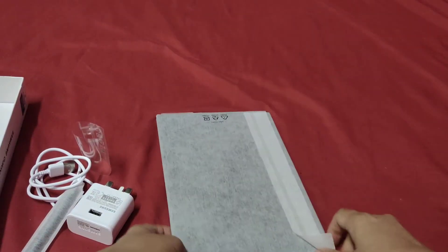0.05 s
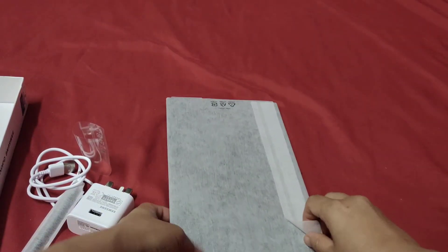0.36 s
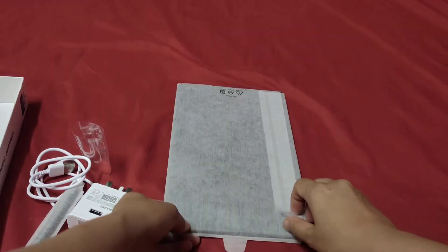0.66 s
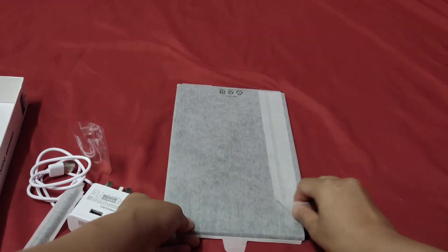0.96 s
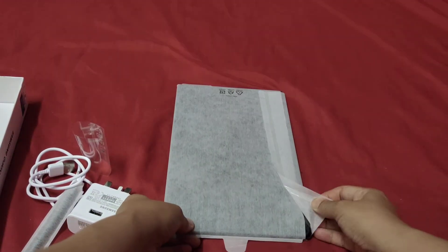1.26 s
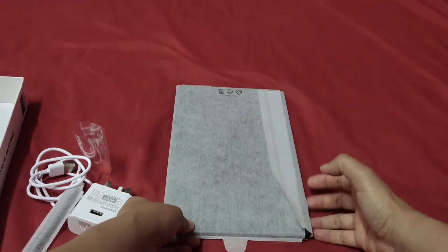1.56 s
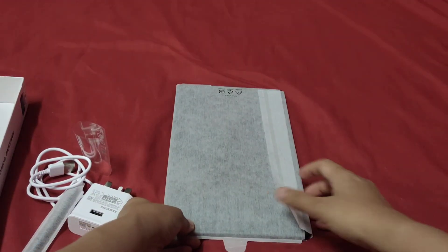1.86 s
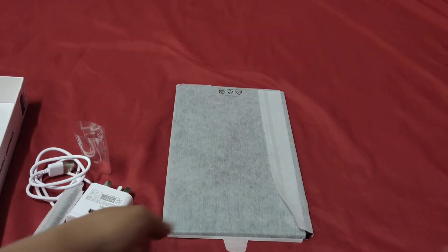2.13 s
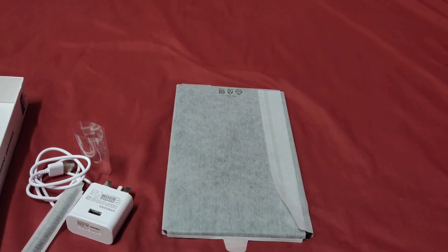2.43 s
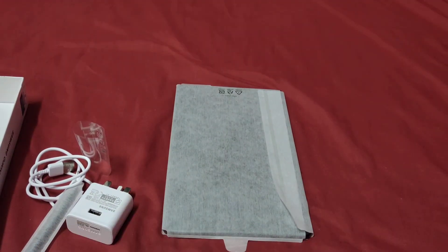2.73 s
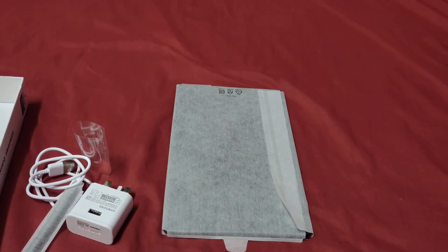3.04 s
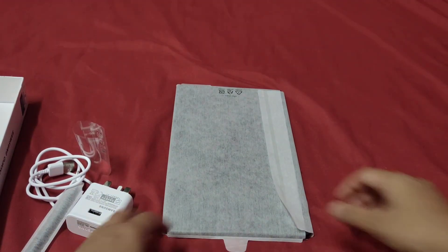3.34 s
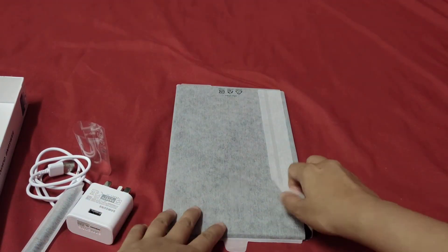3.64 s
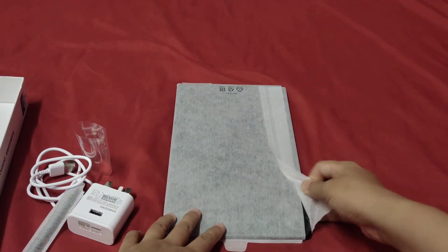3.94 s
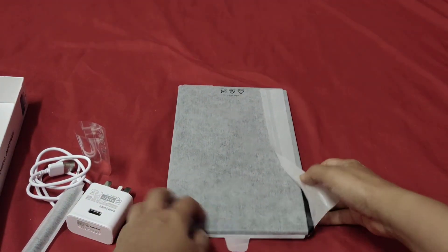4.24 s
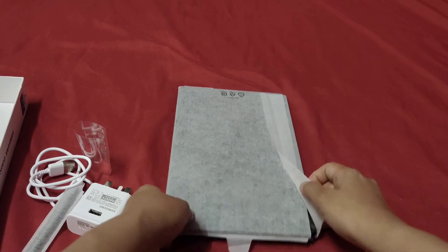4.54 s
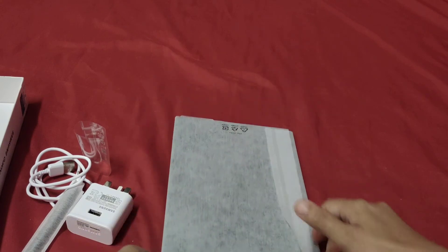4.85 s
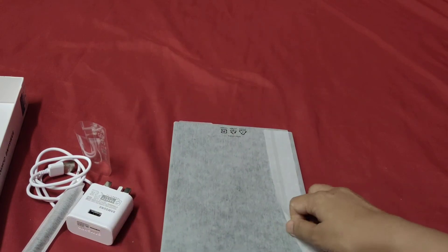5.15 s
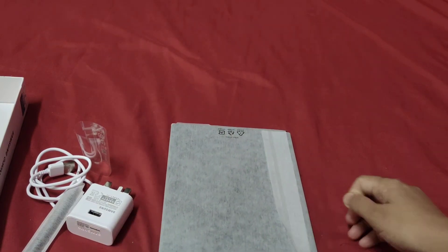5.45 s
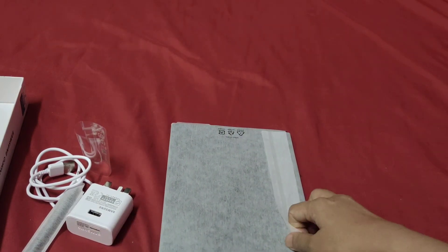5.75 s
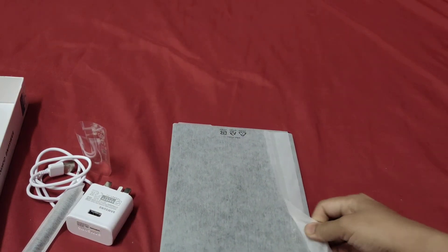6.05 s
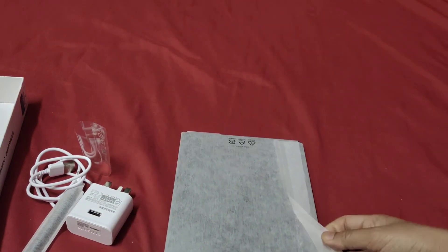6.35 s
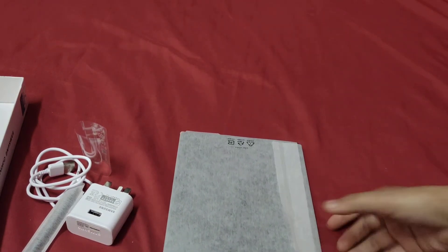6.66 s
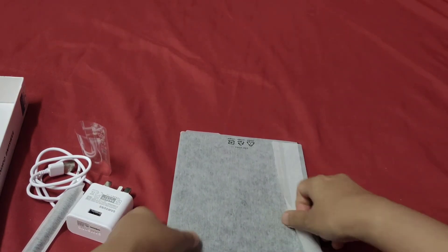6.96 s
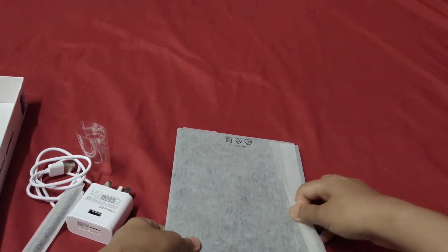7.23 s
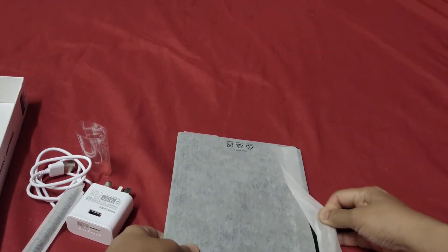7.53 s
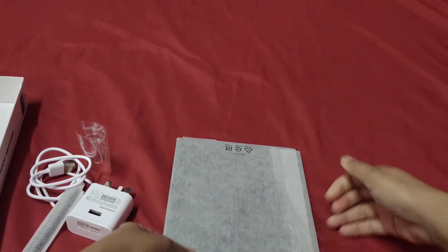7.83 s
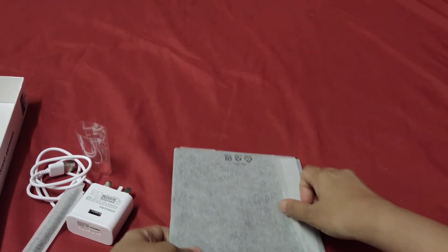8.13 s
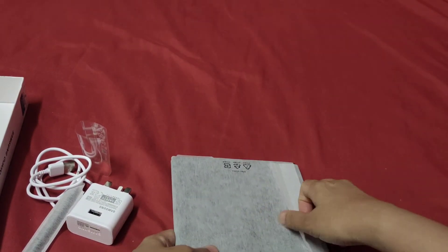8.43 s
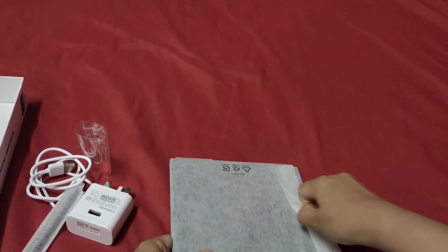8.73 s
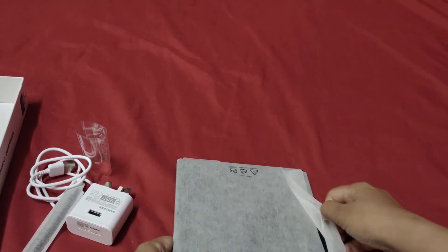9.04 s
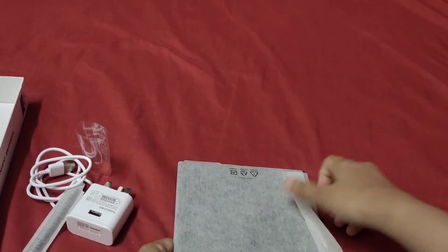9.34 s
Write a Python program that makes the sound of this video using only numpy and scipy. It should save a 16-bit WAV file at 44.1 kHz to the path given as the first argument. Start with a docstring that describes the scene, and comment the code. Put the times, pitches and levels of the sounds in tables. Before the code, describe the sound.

Crisp snaps and crinkles of a glued paper flap being picked open, close by, with faint finger rubs between tugs.

```python
"""A small, quiet room, where hands tug at the glued flap of a stiff paper sleeve on a cloth-covered table.
Energy stored in the bent paper is released in runs of dry snaps as creases buckle and glue spots let go.
Between tugs, fingers rub the sleeve by stick-slip friction, and it is dragged, bumped and patted down.
Near walls answer briefly, a faint motor drones far away, and a phone listens from close by."""
import sys
import numpy as np
from scipy import signal
from scipy.fft import rfft, irfft
from scipy.io import wavfile
from scipy.ndimage import uniform_filter1d

SR = 44100
rng = np.random.default_rng(int(sys.argv[2]) if len(sys.argv) > 2 else 0)


def to_wav(s):
    """Save 16-bit WAV."""
    ch = np.atleast_2d(s).T  # columns
    pcm = np.round(np.clip(ch, -1, 1) * 32767)  # PCM
    wavfile.write(sys.argv[1], SR, pcm.astype(np.int16))


N = 414080


def undb(db):
    """Amplitude ratio: tenfold for every 20 dB."""
    return 10 ** (np.asarray(db) / 20)


def bins(size):
    """Frequencies in Hz of a real Fourier transform."""
    return np.fft.rfftfreq(size, 1 / SR)


def log_curve(hz, points_hz, values):
    """Linear interpolation on a logarithmic frequency axis."""
    return np.interp(np.log(hz + 1), np.log(points_hz), values)


def resonance(hz, centre_hz, width_hz, db):
    """Damped resonance: a spectral peak that rings on after the blow."""
    return 1 + (undb(db) - 1) / (1 + 2j * (hz - centre_hz) / width_hz)


def wander(size, rate_hz):
    """Random modulation: straight lines between Gaussian values."""
    knots = rng.standard_normal(int(size / SR * rate_hz) + 2)
    return np.interp(np.arange(size) / SR * rate_hz, np.arange(len(knots)), knots)


def add(out, sound, start_s):
    """Superposition: a sound joins the mix at a given time."""
    start = max(int(start_s * SR), 0)
    part = sound[..., :N - start]
    out[:, start:start + part.shape[-1]] += part


def stereo_noise(size, share):
    """Partial coherence: two white noises share part of their power, overall or by frequency."""
    common, own = rfft(rng.standard_normal(size)), rfft(rng.standard_normal((2, size)))
    return irfft(np.sqrt(share) * common + np.sqrt(1 - share) * own)


# Noise of the still room. Each row: frequency in Hz, relative spectral density in dB.
AIR_SPECTRUM = [(15, -43), (25, -12), (59, -7), (120, -8.5), (145, -19), (190, -6), (229, -11), (394, -19),
                (489, -19), (1290, -29), (1400, -35.5), (1560, -32.5), (2760, -36.5), (7110, -43.5),
                (16000, -55.5)]


def air(level_db=-70, waver_db=-0.27):
    """Diffuse field: room noise, most coherent in the bass, with a thin band of hiss high up."""
    hz = bins(N)
    field = rfft(stereo_noise(N, log_curve(hz, [100, 1000, 6000], [.65, .45, .35])))
    colour = undb(log_curve(hz, *np.transpose(AIR_SPECTRUM)))
    noise = irfft(field * colour * resonance(hz, 7300, width_hz=500, db=6))
    return noise / np.std(noise.mean(axis=0)) * undb(level_db + waver_db * wander(N, 6))


# Swells of a distant motor. Each row: crest time in seconds, half length in seconds,
# crest level in dB, pitch at the crest in Hz, glide in Hz per second.
MOTOR_SWELLS = [(0.804, .72, -58, 68, -1.9), (3.318, .29, -61, 111.2, 19.5)]


def motor():
    """Transmission loss: only the lowest order of a far motor gets through the walls."""
    out = 0
    for crest_s, half_s, db, hz, glide in MOTOR_SWELLS:
        t = np.arange(N) / SR - crest_s
        swell = np.sqrt(2) * undb(db) * np.exp(-(t / half_s) ** 2)
        out = out + swell * np.sin(2 * np.pi * (hz + glide * t / 2) * t)
    return out


# Reverberant bands. Each row: centre in Hz, gain in dB, time to decay by 60 dB in seconds.
ROOM_BANDS = [(150, -9.5, .2), (550, -5.5, 0.14), (1210, -10, 0.1), (2500, -3, 0.2), (4860, -4, 0.22),
              (8040, -12.5, 0.33), (13900, -9.5, 0.22)]


def room(sound, gap_s=0.0038, build_s=0.0039):
    """Reverberation: reflections from near walls and furniture build a dense, short tail."""
    size = SR // 2
    t, hz = np.arange(size) / SR, bins(size)
    centres, levels, decays = np.transpose(ROOM_BANDS)
    echoes = rfft(stereo_noise(size, share=0.31) * undb(1.4 * wander(size, 700)))
    onset = 1 - np.exp(-np.maximum(t - gap_s, 0) / build_s)
    response = 0
    for weights, db, t60 in zip(np.eye(len(ROOM_BANDS)), levels, decays):
        band = irfft(echoes * log_curve(hz, centres, weights))
        fade = onset * undb(-60 * t / t60)
        response = response + band * undb(db) * fade / np.sqrt(np.sum(fade ** 2))
    return signal.fftconvolve(sound, response, axes=1)[:, :N]


# Coherence of a close sound. Each row: frequency in Hz, share of power common to both ports (0 to 1).
PORT_COHERENCE = [(300, 0.7), (1200, 0), (4500, 0.9), (9000, 0.08)]


def close_noise(size):
    """Spaced receivers: noise at two microphone ports, whose coherence varies with frequency."""
    return stereo_noise(size, log_curve(bins(size), *np.transpose(PORT_COHERENCE)))


# Resonances of sleeve and microphone. Each row: centre in Hz, width in Hz, gain in dB.
RING_PEAKS = [(4710, 410, 4.5), (11900, 780, 3.5)]


def ringing(hz):
    """Resonant colouring: the same peaks shape every rub and snap."""
    return undb(sum(db / (1 + (2 * (hz - centre) / width) ** 2) for centre, width, db in RING_PEAKS))


# Soft knocks on the table. Each row: time in seconds, level in dB.
TABLE_BUMPS = [(2.56, -53), (2.665, -58), (3.08, -71.5), (3.915, -51.5), (6.682, -53.5)]


def bumps(low_hz=48, high_hz=76, rise_s=0.0034, decay_s=0.034):
    """Cushioned impact: a knock through the cloth excites two low modes of the table top."""
    out, t = np.zeros((2, N)), np.arange(SR // 4) / SR
    modes = np.sin(2 * np.pi * low_hz * t) + np.sin(2 * np.pi * high_hz * t)
    thud = modes * np.exp(-t / decay_s) * (1 - np.exp(-t / rise_s))
    for s, db in TABLE_BUMPS:
        add(out, undb(db) * thud, s - .01)
    return out


# Slides of the sleeve. Each row: start in seconds, end in seconds, level in dB.
SLEEVE_DRAGS = [(3.302, 3.59, -77), (4.522, 4.74, -68)]


def drags(band_hz=(220, 650), judder_db=4):
    """Sliding friction: the weight of the sleeve judders dully over the cloth."""
    out = np.zeros((2, N))
    body = signal.butter(2, band_hz, "band", fs=SR, output="sos")
    for start, end, db in SLEEVE_DRAGS:
        size = 2 * int((end - start) * SR / 2)
        slide = signal.sosfilt(body, close_noise(size) * undb(judder_db * wander(size, 55)))
        add(out, slide / np.std(slide) * undb(db) * signal.windows.tukey(size, .5), start)
    return out


# Modes of the air pocket. Each row: frequency in Hz, relative level in dB, 60 dB decay time in seconds.
POCKET_MODES = [(496, 5.5, 0.01), (556, -17, 0.03)]
# The sleeve pressed shut. Each row: start in seconds, level in dB, pitch as a multiple of the pocket's.
SLEEVE_PATS = [(4.795, -53.5, 1), (4.9365, -32.5, 1.25), (7.8587, -19, 1)]


def pats(rise_s=0.00075):
    """Cavity resonance: the hand squeezes the air from under the sleeve with a hollow pop."""
    out, t = np.zeros((2, N)), np.arange(SR // 10) / SR
    for start, level_db, pitch in SLEEVE_PATS:
        pop = sum(undb(db - 60 * t / t60) * np.sin(2 * np.pi * pitch * hz * t)
                  for hz, db, t60 in POCKET_MODES)
        add(out, undb(level_db) * pop * (1 - np.exp(-t / rise_s)), start)
    return out


# Fingers sliding on paper and cloth. Each row: start in seconds, end in seconds,
# relative level in dB, midrange shading in dB, treble shading in dB.
FINGER_RUBS = [(0, .17, -59.5, -3.5, -11), (.17, .43, -62.5, -1, -10), (.4, .56, -68.5, -1, -1.5),
               (.53, .78, -61.5, 0.5, -9), (2.07, 2.24, -60, -13, -16), (3.24, 3.599, -66.5, 7.5, -21.5),
               (3.719, 3.857, -67.5, -3.5, -10), (4.332, 4.88, -69, 2.5, -8), (5.002, 5.08, -64.5, -18, -7),
               (5.11, 5.21, -65, 9.5, -8), (5.41, 5.442, -47.5, 1, -5.5), (5.757, 5.9, -68, 4, -10.5),
               (6.92, 7.143, -66.5, -6.5, -6), (8.146, 8.419, -63, 2, -12), (8.497, 8.68, -74.5, 10.5, -7),
               (8.828, 8.93, -44, 4.5, -11), (9.255, 9.305, -49, 3, -13.5)]
# Tugs at the flap. Each row: time the glue first gives in seconds, relative level of the lead-in rub
# in dB, left minus right level of nearby snaps in dB, their gain into the room in dB.
FLAP_TUGS = [(1.242, -58, 3, -2), (1.646, -69, 3, -.5), (3.995, -70.5, 1.5, 0.5), (4.936, -63, 1, -1.5),
             (6.128, -61.5, 0, 0), (6.672, -56, 3, -1.5), (7.448, -68, 1, -1), (7.857, -62.5, 1, -3.5),
             (8.893, -50, 3.5, 0.5)]


def strokes(lead_s=.095, overlap_s=.035, middle_db=2, top_db=-6):
    """Friction under load: the free finger rubs, plus a short, bright one that leads into each tug."""
    return FINGER_RUBS + [(s - lead_s, s + overlap_s, db, middle_db, top_db) for s, db, _, _ in FLAP_TUGS]


def rubbing(gain_db=-2, grain_db=2.5, waver_db=3, grain_samples=32):
    """Stick-slip friction: fibres catch and slip, stirring two broad sheet modes into an uneven swish."""
    out = np.zeros((2, N))
    for start, end, db, middle_db, top_db in strokes():
        size = 2 * int((end - start) * SR / 2)
        hz = bins(size)
        # a fibre holds only so much before it slips
        holds = np.minimum(rng.exponential(size=size // grain_samples + 1), 4.5)
        catches = undb(grain_db * np.repeat(holds, grain_samples)[:size])
        fibres = close_noise(size) * catches / np.sqrt(np.mean(catches ** 2))
        colour = undb(log_curve(hz, [200, 1500, 2500, 4800, 9500, 15500],
                                [-8, middle_db - 7.5, middle_db - 4, -3, top_db, top_db]))
        modes = resonance(hz, 4800, width_hz=880, db=4) * resonance(hz, 2600, width_hz=600, db=3)
        pressure = signal.windows.tukey(size, 0.71) * undb(db + gain_db + waver_db * wander(size, 56))
        add(out, irfft(rfft(fibres) * colour * ringing(hz) * modes) * pressure, start)
    return out


def stray_ticks(per_second=2.2, above_stroke_db=18.5, spread_db=2, top_db=-3, low_hz=2390, high_hz=6000):
    """Small-scale buckling: tiny creases give way at random under a sliding finger."""
    ticks = []
    for start, end, stroke_db, _, _ in strokes():
        count = int((end - start) * per_second + .5)
        for when, strength, facet in rng.random((count, 3)):
            db = stroke_db + above_stroke_db + spread_db * (2 * strength - 1)
            ping_hz = low_hz + facet * (high_hz - low_hz)
            ticks.append((start + when * (end - start), db, 0, top_db, ping_hz))
    return crinkle(ticks)


def snap(body_db, top_db, ping_hz, rise_s=0.00051, fall_s=0.00055, bending_s=0.0014, size=1024):
    """Buckling: fibres give way in a millisecond of tiny fractures, and the freed facet pings."""
    t, hz = (np.arange(size) - size // 2) / SR, bins(size)
    fracture = np.tanh(0.66 * np.exp(-np.abs(t) / np.where(t < 0, rise_s, fall_s)))
    # a faint, brief swell of noise before the snap and a short fade after it
    skirts = undb(-24) * np.exp(-np.abs(t) / np.where(t < 0, .0025, .004))
    burst = rfft(close_noise(size) * (fracture + skirts))
    # so brief a burst is broad: only narrow ripples remain in its spectrum
    burst = burst / np.sqrt(uniform_filter1d(np.abs(burst) ** 2, size=61, axis=-1))
    middle_db = 0.55 * body_db - 0.2  # a larger facet has more body and more midrange
    shape_db = [body_db - 14, body_db, (body_db + middle_db) / 2, middle_db, 0, top_db, top_db - 6.5]
    colour = undb(log_curve(hz, [60, 450, 1100, 2300, 4800, 9500, 15500], shape_db))
    delay_s = bending_s / (1 + hz / 900)  # dispersion: slow bending waves bring the lows late
    burst = burst * colour * ringing(hz) * np.exp(-2j * np.pi * np.cumsum(delay_s) * hz[1])
    ping_db = min(11 - 4.5 * np.log2(ping_hz / 2580), 12)  # small, high facets ping more weakly
    # the ping is sharp along one line of sight and blurs when summed over all directions
    window = signal.windows.tukey(size, .5)
    to_phone = irfft(burst * resonance(hz, ping_hz, width_hz=600, db=ping_db)) * window
    to_walls = irfft(burst * resonance(hz, ping_hz, width_hz=2400, db=0.42 * ping_db)) * window
    return to_phone, to_walls


def crinkle(snaps, facing_db=1.1):
    """Direct and reverberant sound: snaps lie at the nearest tug, each facing a little to one side."""
    direct, thrown = np.zeros((2, 2, N))
    for s, db, body_db, top_db, ping_hz in snaps:
        _, _, side_db, room_db = min(FLAP_TUGS, key=lambda tug: abs(tug[0] - s))
        pan_db = side_db + facing_db * rng.standard_normal()
        to_phone, to_walls = snap(body_db, top_db, ping_hz)
        start = s - to_phone.shape[1] / 2 / SR
        add(direct, to_phone * undb(db + np.array([[pan_db], [-pan_db]]) / 2), start)
        add(thrown, to_walls * undb(db + room_db), start)
    return direct + room(thrown)


# Creases and glue spots letting go, and the faint ticks of fingertips and nails on the sleeve. # Each row: time
# in seconds, strength in dB, body and treble relative to that strength in dB, ping in Hz.
FLAP_SNAPS = [(0.4515, -38, -3.0, 9.5, 2210), (0.7934, -42, -7, 4.5, 8030), (1.147, -34, -6.0, -9.5, 2500),
              (1.1723, -14.5, -15.5, -13.5, 2600), (1.2422, -12.5, 3.5, 7.5, 4930),
              (1.2539, -2, -13, -1, 1450), (1.2573, -11.5, -8.5, -3, 2610), (1.2629, -10.5, -3.5, -5, 2960),
              (1.2705, -7, 0.5, 1, 2550), (1.2858, 0, -12, -2.5, 2550), (1.2927, -2.5, -1, -1, 2800),
              (1.2998, 0.5, -5, -4.5, 2930), (1.308, 0, -1.5, -2, 2847), (1.319, -7, -2.5, -1, 3100),
              (1.6451, -10, 3.5, 2, 2230), (2.167, -49, -1, 11, 4760), (2.8959, -32, -8, -30, 2730),
              (3.995, -3.5, -15.0, -1.5, 1720), (4.0131, -4.5, -0.5, -4, 5520), (4.0288, 1.5, -2, -1, 7390),
              (4.0351, -3, -5, -10, 7390), (4.061, -8, 4, -2, 6000), (4.086, -4.0, -2.5, -1, 1800),
              (4.1001, -2, 2, -3, 8000), (4.307, -21, -10.5, -16, 1480), (4.3672, -19, -14.5, -10, 4880),
              (4.5838, -18, -12.5, -2, 2430), (4.8406, -23, -1.0, -3, 7500), (4.844, -22.5, 5, -13, 5040),
              (4.9363, -13, 2, 0.5, 2480), (5.251, -21.5, -6.5, -4, 1550), (5.2657, -31, 3, 8, 2130),
              (5.4152, -23.5, -18, -2, 5980), (5.8562, -32, -5.5, -18, 2290), (6.026, -25.5, 9.5, 2, 2450),
              (6.1282, 0.5, -3, -2, 4170), (6.1681, 5.0, -15.5, -3.5, 2210), (6.2515, 1.5, -0.5, -5, 3360),
              (6.2732, 6, -6, -6, 4630), (6.2913, 3.5, -1, -4.5, 4900), (6.4335, -25.5, -8, -4, 5120),
              (6.5896, -36.5, 6, -6.5, 2960), (6.6282, -17.0, -7.5, -15.5, 2600),
              (6.6721, 8.5, -4.5, -7.5, 4880), (7.1181, -37, -9, 2, 6880), (7.3389, -18.0, -2, -0.5, 5080),
              (7.4471, -3.5, -6, 7, 1530), (7.4897, 3.5, -4, -4.5, 4600), (7.4946, 10.5, -28, -11.5, 2320),
              (7.4984, 8, -24.0, -10.5, 1800), (7.504, 1.5, -10.5, -2.5, 5080),
              (7.5304, 4.5, -7.5, 0.5, 2300), (7.5404, 2, 2, -10, 4880), (7.5567, 3, -8.5, -12.5, 4830),
              (7.5652, 1, -5, -10, 2340), (7.576, -2.5, -1.5, -8, 5250), (7.5967, 0, -0.5, -7, 4900),
              (7.611, -1.5, 0.5, -8.5, 5490), (7.858, -6.5, -5, -3.5, 2060),
              (8.0639, -40.5, 7.5, -12, 2070), (8.7945, -25, -5.5, 1, 2310), (8.8926, 0, -3.5, -4, 5130),
              (8.9165, 4, -20, -1.5, 2600), (9.0048, 0.5, -9.5, -8.5, 2770), (9.0564, 0.5, -2, -4.5, 2720),
              (9.0807, -3, -0.5, -2.5, 1490), (9.2872, -28, 5, -5.5, 4560)]


def flap(spots=3):
    """Release of elastic energy: the flap snaps at a few spots, each with its own room response."""
    return sum(crinkle(FLAP_SNAPS[k::spots]) for k in range(spots))


def scene():
    """Superposition: paper sounds and their reverberation add to the quiet background."""
    snaps = flap()
    handling = rubbing() + pats() + drags()
    background = motor() + air()
    return background + handling + room(handling) + bumps() + stray_ticks() + snaps


def record(dry, cutoff_hz=16000):
    """Band limiting: the phone cuts the highest treble with a steep low-pass filter."""
    return signal.sosfilt(signal.ellip(8, .2, 70, cutoff_hz, fs=SR, output="sos"), dry)


dry = scene()
out = record(dry)
to_wav(out)
```